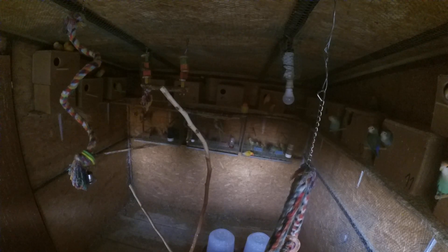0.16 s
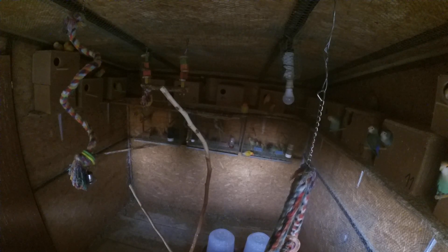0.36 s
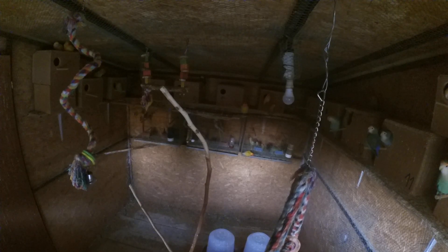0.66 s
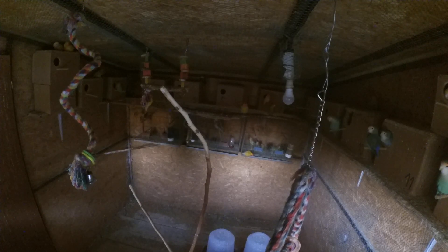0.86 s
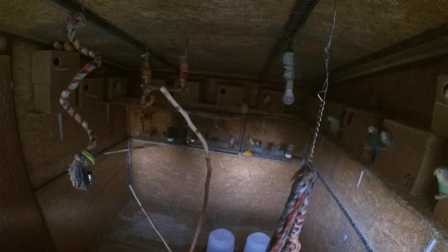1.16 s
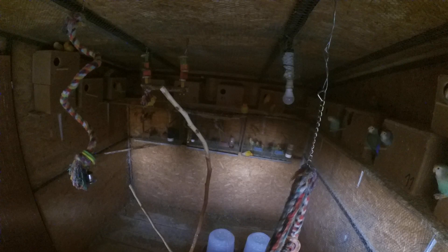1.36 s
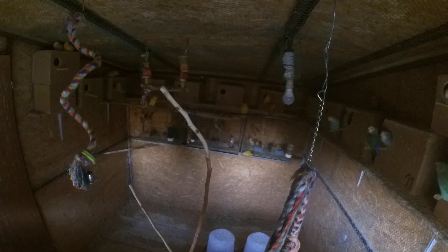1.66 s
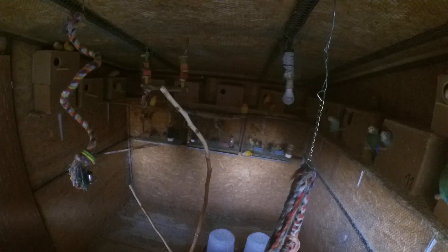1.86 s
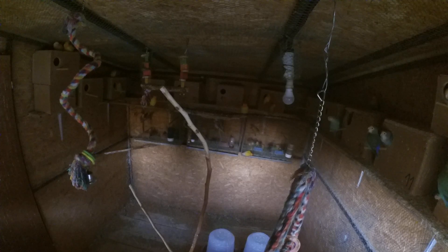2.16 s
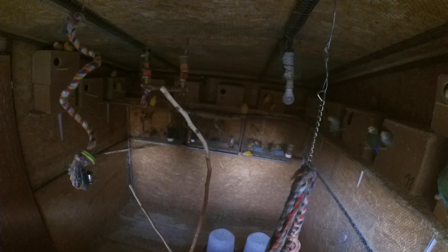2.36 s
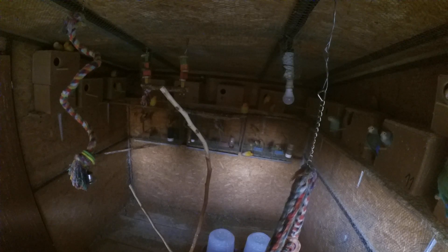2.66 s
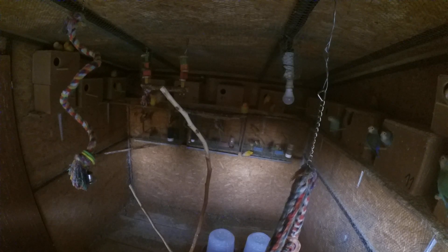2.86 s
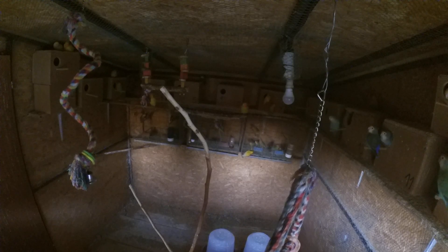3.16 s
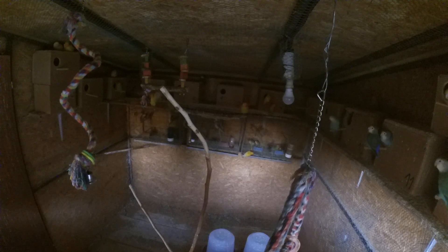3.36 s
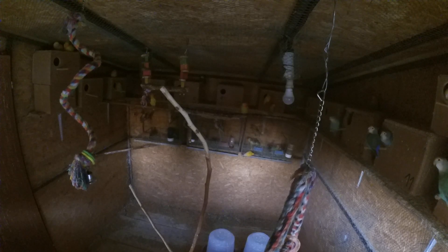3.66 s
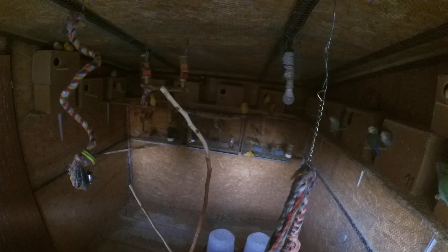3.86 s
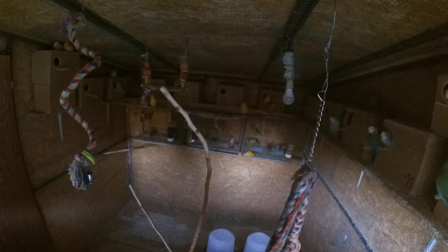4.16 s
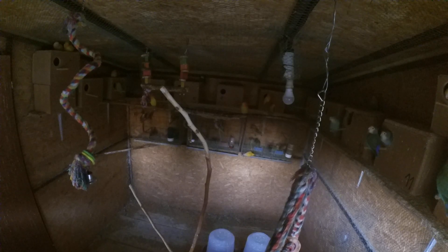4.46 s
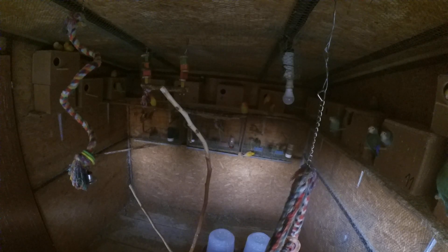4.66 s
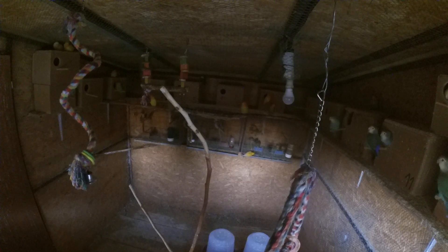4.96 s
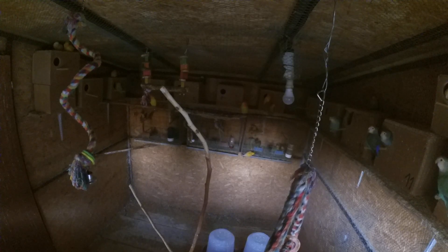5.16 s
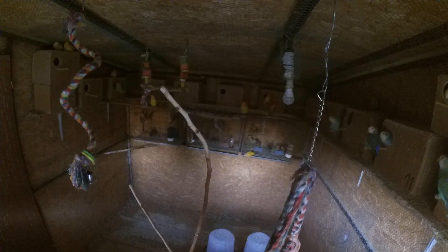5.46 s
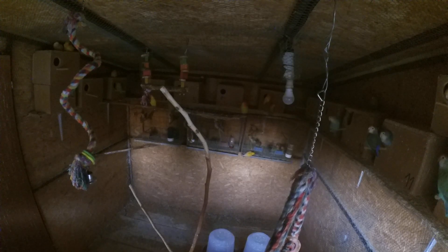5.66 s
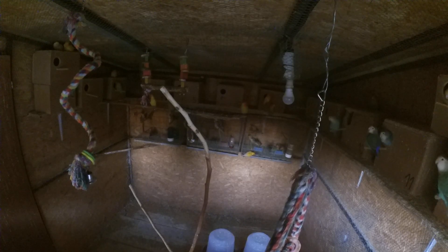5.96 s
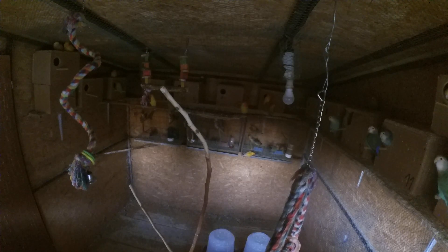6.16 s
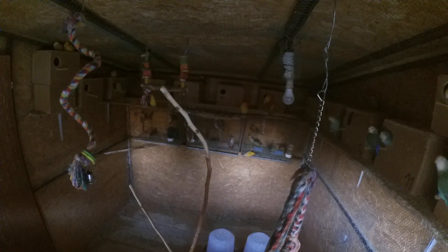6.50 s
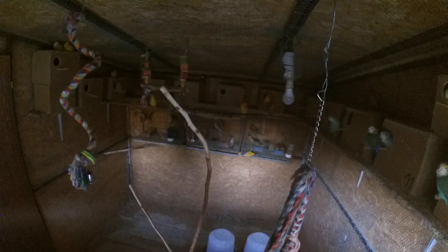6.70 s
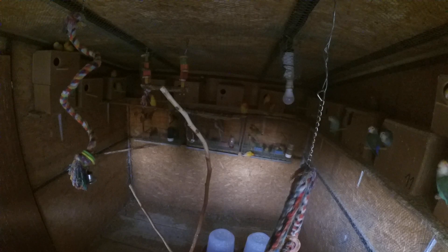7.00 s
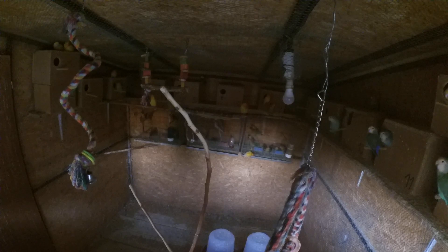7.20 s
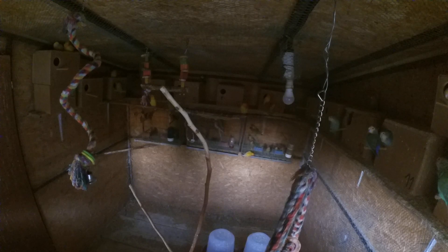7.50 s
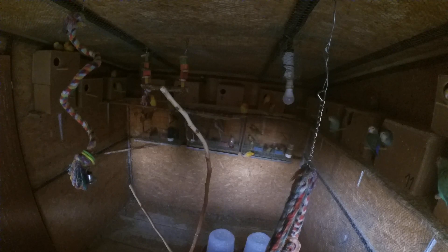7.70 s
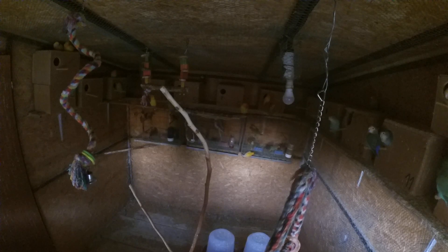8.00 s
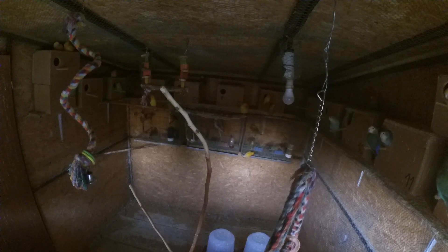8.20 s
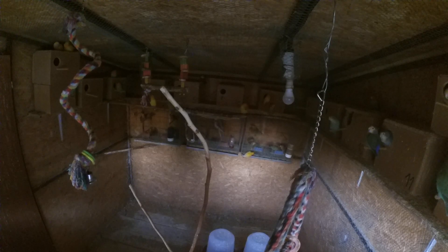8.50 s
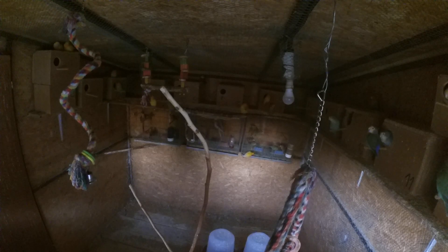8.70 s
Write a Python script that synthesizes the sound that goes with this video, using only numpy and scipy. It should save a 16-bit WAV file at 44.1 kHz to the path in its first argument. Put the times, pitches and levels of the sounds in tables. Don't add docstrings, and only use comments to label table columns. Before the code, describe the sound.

Small parrots chirp in sharp, rough bursts inside a wooden aviary, with quiet gaps holding only faint rumble, hiss and a low fan hum.

```python
import sys
import numpy as np
from scipy import signal
from scipy.io import wavfile
from scipy.ndimage import uniform_filter1d

SR = 44100
rng = np.random.default_rng(int(sys.argv[2]) if len(sys.argv) > 2 else 0)


def elevation(decibels):
    levels = np.asarray(decibels, float)
    return 10 ** (levels / 20)


def unload_wav(signal):
    wavfile.write(
        sys.argv[1],
        SR,
        np.round(np.clip(np.atleast_2d(signal).T, -1, 1) * 32767).astype(np.int16),
    )


N = 389844

# start_s, climb_s, start_hz, high_hz, level_db
LEAPS = [
    (.503, 0.026, 5025, 6516, -27.5),
    (1.062, 0.0085, 5250, 6525, -24),
    (1.511, 0.019, 4420, 6830, -32),
    (2.902, 0.05, 4256, 6290, -24),
    (3.212, 0.052, 4280, 6253, -23.5),
    (3.614, 0.031, 4427, 6360, -23),
]
CLIMB_SHARE, CLIMB_RISE_DB = .65, 3
SNAP_S, SNAP_HZ, SNAP_DB, SNAP_FADE_DB = 0.0055, 5250, 2, 9.5
HIGH_S, HIGH_DB, HIGH_FADE_DB = .016, -1, 3.5

# start_s, length_s, pitch_hz, final_db
SWELLS = [(1.129, 0.036, 2948, -34.5), (1.483, 0.034, 3840, -39), (1.618, 0.078, 3370, -42.5),
          (1.714, 0.0043, 3940, -33), (.12, 0.016, 4260, -26), (1.754, 0.012, 4090, -42),
          (1.915, 0.03, 4190, -42), (1.915, 0.018, 5400, -55), (1.926, 0.05, 3394, -41.5),
          (2.249, 0.0091, 3560, -39), (2.476, 0.015, 3850, -36), (2.486, 0.018, 4123, -31.5),
          (3.247, 0.019, 4270, -31), (3.312, 0.05, 5073, -14), (5.57, 0.0077, 3480, -24.5),
          (5.658, 0.011, 3964, -28.5), (5.831, 0.0072, 5250, -33.5), (5.85, 0.022, 4330, -40),
          (5.998, 0.023, 3913, -38), (6.617, 0.023, 4305, -32), (6.635, 0.028, 4060, -29),
          (7.636, 0.022, 3480, -47), (8.616, 0.013, 4123, -21.5), (8.68, 0.011, 4120, -25),
          (8.712, 0.048, 3350, -25.5)]
SWELL_DB, SWELL_HZ_PER_S = 14, 1620

# start_s, length_s, pitch_hz, level_db
HOLDS = [(.04, 0.0052, 5150, -23), (.053, 0.025, 6400, -28.5), (.138, .012, 4200, -18),
         (.156, 0.023, 4250, -30), (.154, .014, 4900, -30), (.178, 0.021, 6300, -29.5),
         (.362, 0.029, 5200, -28.5), (.627, .008, 5200, -34), (.872, 0.026, 4150, -22),
         (1.942, 0.027, 4150, -42), (1.93, 0.033, 6800, -56.5), (5.299, 0.015, 5300, -43),
         (5.418, .016, 3830, -25.5), (5.584, 0.0079, 4110, -20), (5.84, 0.027, 3900, -30),
         (5.878, 0.041, 3640, -24.5), (.668, 0.021, 5950, -35.5), (.67, 0.016, 6500, -39.5),
         (.952, 0.017, 6120, -30.5), (.906, 0.035, 3883, -26), (1.121, 0.062, 4200, -41),
         (1.601, 0.053, 1700, -56), (1.674, 0.043, 4030, -38), (1.69, 0.019, 3500, -44),
         (1.712, 0.036, 3290, -41.5), (1.785, 0.042, 2067, -55.5), (2.269, 0.016, 4060, -33),
         (2.297, 0.017, 4180, -33), (2.319, 0.055, 3930, -31), (4.022, 0.046, 3260, -50.5),
         (5.674, 0.029, 3220, -27), (5.922, 0.056, 3930, -20), (6.599, 0.033, 4150, -47),
         (6.62, .02, 3720, -39), (6.652, 0.026, 4450, -32.5), (6.667, 0.011, 5080, -36),
         (6.674, .013, 4170, -26.5), (6.683, 0.016, 3800, -40), (6.7, 0.013, 4280, -33),
         (7.608, 0.037, 3320, -58), (7.657, 0.03, 4100, -42), (7.662, 0.031, 3500, -42),
         (8.211, 0.052, 3450, -62), (8.708, 0.055, 6750, -42), (8.793, 0.067, 3450, -48)]
HOLD_FADE_DB, HOLD_HZ_PER_S = 0, 300

# start_s, length_s, pitch_hz, first_db
BARKS = [(.973, .003, 5404, -15), (.983, .003, 5600, -17.5), (1.158, 0.0065, 4080, -29),
         (5.385, .003, 4140, -25), (5.452, .016, 3850, -29), (3.549, .006, 4050, -23),
         (5.603, .012, 4130, -15), (.208, 0.0094, 6410, -44), (.637, 0.0036, 4340, -20),
         (.946, 0.0097, 4140, -19.5), (.966, .037, 6060, -39), (1.086, 0.015, 4097, -18.5),
         (1.092, 0.019, 5050, -28), (1.191, 0.022, 6793, -40), (1.513, 0.018, 4480, -23),
         (1.544, 0.041, 5430, -35), (1.776, 0.037, 4122, -28), (2.526, 0.079, 3950, -39),
         (2.55, .04, 7620, -55), (3.388, 0.0071, 7060, -22), (3.656, .031, 5240, -30),
         (5.309, 0.1, 4040, -33), (5.385, 0.022, 5280, -37), (5.677, 0.022, 4235, -26),
         (6.697, 0.013, 4070, -24), (6.948, 0.018, 3926, -41.5), (7.61, .06, 6470, -62),
         (7.713, 0.049, 3450, -56), (8.584, 0.015, 4100, -18.5), (8.606, 0.021, 5000, -26),
         (8.59, 0.03, 6070, -33.5), (8.618, 0.034, 5780, -29), (8.648, 0.054, 3137, -28),
         (8.792, 0.089, 3820, -37)]
BARK_FADE_DB, BARK_HZ_PER_S = 12.5, 310

# start_s, length_s, start_hz, end_hz, final_db
SLIDES = [(1.171, .028, 3280, 3500, -24), (.37, 0.028, 5790, 6700, -30), (.399, .016, 6700, 6100, -32.5),
          (.638, 0.024, 4400, 5700, -26), (.655, .022, 5980, 6800, -34), (.836, 0.029, 3946, 4150, -33),
          (0.79, 0.052, 3300, 3800, -54.5), (.945, .042, 5074, 5500, -28), (1.484, 0.023, 5380, 6090, -41),
          (1.528, 0.021, 4960, 5330, -34.5), (1.599, 0.021, 3240, 3660, -44),
          (2.277, 0.021, 4600, 5660, -44.5), (2.507, 0.017, 4800, 5720, -44),
          (2.692, 0.025, 2790, 3100, -57), (2.693, 0.025, 4300, 4620, -57),
          (3.216, 0.035, 6390, 7160, -43.5), (3.365, 0.02, 6440, 6940, -26),
          (3.492, 0.04, 3490, 3934, -38.5), (3.538, 0.028, 3947, 4200, -26.5),
          (3.555, 0.083, 3873, 4250, -29), (3.594, 0.043, 6030, 6840, -36.5),
          (5.328, 0.05, 4647, 4300, -30), (5.371, 0.0697, 3945, 3765, -32), (5.382, 0.021, 4240, 4350, -44),
          (5.706, 0.063, 3783, 4155, -34.5), (6.952, 0.026, 4595, 3950, -49.5),
          (8.571, 0.017, 3510, 3980, -39.5), (8.676, 0.031, 2016, 2184, -42.5),
          (8.754, 0.014, 3440, 3680, -22.5), (8.772, 0.016, 3710, 3854, -19.5)]
# start_s, length_s, start_hz, end_hz, final_db
ASIDES = [(4.02, .045, 6100, 6600, -66), (4.022, .045, 9300, 9800, -67), (4.02, .035, 7700, 7750, -69),
          (4.02, .03, 4400, 4600, -66), (6.985, .04, 11000, 11050, -71), (7.61, .04, 9600, 10000, -70),
          (7.43, .04, 8800, 8900, -74), (2.468, .012, 3300, 4000, -44), (0, 0.0065, 4710, 4850, -38),
          (0.023, 0.023, 3780, 4010, -36.5), (.16, 0.015, 6700, 6900, -40), (0.36, 0.0086, 3930, 4080, -47),
          (2.466, 0.03, 3260, 3490, -50), (3.296, .012, 6190, 6310, -30.5),
          (5.621, 0.032, 2886, 3066, -34.5), (7.43, 0.012, 3100, 3040, -62.5),
          (1.129, 0.043, 5800, 6100, -39.5), (6.606, .035, 3060, 3480, -44.5),
          (6.69, 0.028, 3300, 3100, -47), (1.481, 0.037, 4100, 4220, -40.5),
          (1.595, 0.062, 4270, 4130, -46.5), (1.109, 0.017, 3940, 3200, -29.5),
          (6.925, 0.014, 3300, 3570, -51), (6.93, 0.021, 6840, 7150, -77), (6.99, 0.037, 3560, 3850, -50.5),
          (7.427, 0.01, 5880, 6120, -68.5), (7.678, 0.017, 7000, 7070, -58),
          (8.195, 0.036, 2900, 3300, -62), (8.196, 0.022, 5640, 6100, -69),
          (8.217, 0.031, 6830, 6830, -70.5), (8.25, .025, 6220, 6100, -70), (8.271, 0.014, 4300, 4300, -69)]
SLIDE_SWELL_DB = 4.5

# start_s, length_s, start_hz, end_hz, final_db
RUN_UPS = [(.11, 0.01, 3440, 4130, -34.5), (.348, 0.0072, 3900, 5230, -32), (.494, 0.0086, 3800, 5080, -39),
           (.02, 0.0096, 4200, 4900, -34), (.029, .007, 4900, 5300, -21), (.936, .007, 3800, 4990, -30),
           (1.055, .005, 3900, 5200, -28.5), (1.508, 0.0039, 3900, 6370, -32),
           (6.66, 0.024, 4600, 6200, -39.5), (.617, 0.018, 4100, 4450, -46),
           (2.895, 0.0075, 3994, 4140, -36.5), (3.205, 0.022, 3390, 3740, -37.5),
           (5.281, 0.015, 3900, 4530, -38), (5.311, 0.02, 3950, 4520, -33)]
RUN_UP_SWELL_DB = 5

# start_s, harshness (0-1), half_pitch_db (half-pitch line and its odd multiples)
VOICE = [(0, .5, -24), (.13, .15, -28), (.15, .9, -24), (.8, .4, -40), (.94, .85, -28), (1.16, .2, -36),
         (1.4, .8, -32), (2.31, .2, -38), (2.45, .8, -36), (2.85, .65, -24), (3.31, .06, -27),
         (3.36, .5, -26), (3.48, .65, -36), (3.6, .7, -25), (4, .3, -34), (5.2, .85, -32), (5.4, .2, -34),
         (5.5, .4, -32), (5.61, .2, -38), (5.68, .6, -38), (5.87, .45, -40), (6.5, .9, -34),
         (8.64, .3, -34)]
# multiple (of its pitch), level_db
PARTIALS = [
    (.5, 2),
    (1, 1.5),
    (1.5, 3.5),
    (2, -23),
    (2.5, -9.5),
]
FLUTTER_HZ, RASP_HZ, WAVER_HZ = 205, 910, 148
ATTACK_S, RELEASE_S, LOUDEST_DB = .004, .007, -18.5
BEAK_CUT_HZ = 10000
BREATH_DB, BREATH_HZ, BREATH_TOP_HZ = -9, 3300, 7060

AVIARY_T60_S, TREBLE_T60_S, AVIARY_DB = 0.2, 0.17, -5
LATE_T60_S, LATE_DB = .45, -31.5

# multiple (of the turn rate), level_db
HUM = [
    (1, -66),
    (2, -73.5),
    (3, -80.5),
]
# centre_hz, width_hz, level_db
RATTLE = [
    (1528, 150, -6),
    (2330, 220, -1),
    (2620, 280, 4.5),
    (3050, 420, -2),
    (4300, 790, -7.5),
]
TURNS_PER_S, RATTLE_DB = 68, -66
TICK_DB = -78.5

# start_s, length_s, treble_lift_db
RUSTLES = [(2.61, .19, 4), (3.74, .09, 5), (3.865, .085, 6), (4.02, .08, 7), (4.23, .1, 5), (4.55, .1, 4),
           (4.685, .025, 6), (4.89, .13, 5), (5.155, .105, 5), (6.325, .105, 6), (7.05, .09, 5),
           (7.355, .075, 5), (7.46, .05, 5), (7.78, .09, 4), (7.905, .04, 5), (8.0, .06, 4), (8.31, .04, 4)]
RUSTLE_TOP_HZ, RUSTLE_RATTLE = 10500, .06

# frequency_hz, density_db (per Hz)
AIR = [(7.1, -32), (12, 6), (70, -4), (92, -13.5), (136, -13.5), (163, -31.5), (201, -21), (240, -23),
       (847, -33.5), (2490, -32.5), (4020, -36.5), (15500, -53)]
AIR_DB = -52
# time_s, wind_db, traffic_db
AROUND = [
    (0, 2.5, 21),
    (.8, 6.5, 9.5),
    (1.3, 3, -3),
    (3, 4.5, 3),
    (4.1, -1, 0),
    (4.3, 1, 5.5),
    (5.2, 0, 7.5),
    (6.1, -3.5, -3.5),
    (7.9, 2, 0),
    (8.84, 0.5, -1),
]

# start_s, length_s, level_db
CHATTER = [
    (4.33, .65, -76),
    (6.47, .13, -73),
    (7.32, .1, -75),
    (8.28, .15, -78),
]
CHATTER_HZ, CHATTER_WIDTH_HZ = 4200, 400

CHIP_RATE, FILE_RATE = 49152, 48000
PRESENCE_HZ, PRESENCE_WIDTH_HZ, PRESENCE_DB = 12730, 2800, -3
CUTOFF_HZ = 15800


def drift(rate, size=N):
    r = np.exp(-2 * np.pi * rate / SR)
    slow = signal.lfilter([1], [1, -2 * r, r * r], rng.standard_normal(size + SR))[SR:]
    return slow / np.std(slow)


def in_time(rows):
    s, *columns = np.transpose(rows)
    return [np.interp(np.arange(N) / SR, s, c) for c in columns]


def spans(rows):
    t = np.arange(N) / SR
    gate = sum(value * ((t >= s) & (t < s + length)) for s, length, value in rows)
    return uniform_filter1d(gate, size=200)


def resonance(x, hz, width):
    r = np.exp(-np.pi * width / SR)
    poles = [1, -2 * r * np.cos(2 * np.pi * hz / SR), r * r]
    return signal.lfilter([(1 - r * r) / 2, 0, (r * r - 1) / 2], poles, x)


def band(x, low_hz, high_hz):
    return signal.sosfilt(signal.butter(2, [low_hz, high_hz], "band", fs=SR, output="sos"), x)


def notes():
    out = []
    for s, climb, hz, high_hz, db in LEAPS:
        climb_end_hz = hz + CLIMB_SHARE * (SNAP_HZ - hz)
        snap_db, high_db = db + SNAP_DB, db + HIGH_DB
        out += [(s, climb, hz, climb_end_hz, db - CLIMB_RISE_DB, db),
                (s + climb - SNAP_S / 2, SNAP_S, SNAP_HZ, SNAP_HZ, snap_db, snap_db - SNAP_FADE_DB),
                (s + climb, HIGH_S, high_hz, high_hz, high_db, high_db - HIGH_FADE_DB)]
    for table, hz_per_s, rise_db, fall_db in [(SWELLS, SWELL_HZ_PER_S, SWELL_DB, 0),
                                              (HOLDS, HOLD_HZ_PER_S, 0, HOLD_FADE_DB),
                                              (BARKS, BARK_HZ_PER_S, 0, BARK_FADE_DB)]:
        for s, length, hz, db in table:
            half_glide = hz_per_s * length / 2
            out.append((s, length, hz - half_glide, hz + half_glide, db - rise_db, db - fall_db))
    for table, rise_db in [(RUN_UPS, RUN_UP_SWELL_DB), (SLIDES, SLIDE_SWELL_DB), (ASIDES, SLIDE_SWELL_DB)]:
        out += [(s, length, hz, end_hz, db - rise_db, db) for s, length, hz, end_hz, db in table]
    return out


def birds():
    voice, effort = np.zeros(N), np.zeros(N)
    flutter, rasp, waver = drift(FLUTTER_HZ), drift(RASP_HZ), drift(WAVER_HZ)
    for k, (s, length, start_hz, end_hz, start_db, end_db) in enumerate(notes()):
        first = max(0, round((s - .0015) * SR))
        at = np.arange(first, min(N, round((s + length + 0.0079) * SR)))
        along = np.linspace(0, 1, len(at))
        _, harsh, half_db = [row for row in VOICE if row[0] <= s][-1]
        own = (at + 977 * k) % N

        ramp = np.minimum(along / ATTACK_S, (1 - along) / RELEASE_S) * len(at) / SR
        edges = np.sin(np.pi / 2 * np.minimum(1, ramp)) ** 2
        level_db = start_db + (end_db - start_db) * np.minimum(1, 1.55 * along)
        level = elevation(np.minimum(LOUDEST_DB, level_db)) * edges

        pitch_hz = start_hz + (end_hz - start_hz) * along + 120 * harsh * waver[own]
        phase = 2 * np.pi * np.cumsum(pitch_hz) / SR
        tone = 0
        for m, partial_db in PARTIALS:
            beak = 1 / (1 + (m > 1) * (m * start_hz / BEAK_CUT_HZ) ** 6)
            tone = tone + elevation(partial_db + half_db * (m % 1 > 0)) * beak * np.sin(m * phase)
        roughness = 1 + harsh * (.55 * flutter[own] + .3 * rasp[own])
        voice[at] += np.sqrt(2) * level * roughness * tone
        effort[at] += level * harsh ** 2
    breath = effort * rng.standard_normal(N)
    for _ in range(2):
        breath = band(breath, BREATH_HZ, BREATH_TOP_HZ)
    return elevation(-2.5) * voice + elevation(BREATH_DB) * breath


def aviary(x):
    t = np.arange(SR // 2) / SR
    low, high = rng.standard_normal((2, len(t))) * np.clip((t - .002) / 0.0013, 0, 1)
    tail = band(low, 100, 5450) * elevation(-60 * t / AVIARY_T60_S)
    tail = tail + band(high, 5260, 11000) * elevation(-60 * t / TREBLE_T60_S)
    tail = tail + band(high, 2500, 7000) * elevation(LATE_DB - 60 * t / LATE_T60_S)
    tail = tail / np.sqrt(np.sum(tail ** 2))
    return x + elevation(AVIARY_DB) * signal.fftconvolve(x, tail)[:N]


def fan():
    turns = np.cumsum(TURNS_PER_S + 4 * drift(5) + 4 * drift(20)) / SR
    hum = 0
    for m, level_db in HUM:
        hum = hum + np.sqrt(2) * elevation(level_db + 2.5 * drift(7.8)) * np.sin(2 * np.pi * m * turns)

    strength = elevation(2.5 * np.clip(rng.standard_normal(N // 100), -3, 1.2))[turns.astype(int)]
    contact = np.exp(-((turns % 1 - .5) / .12) ** 2)
    scrape = strength * contact * rng.standard_normal(N)
    scrape = scrape + RUSTLE_RATTLE * spans(RUSTLES) * rng.standard_normal(N)

    rattle = 0
    for hz, width, level_db in RATTLE:
        rattle = rattle + elevation(level_db) * resonance(resonance(scrape, hz, width), hz, 2 * width)
    rattle = band(rattle, 1300, 3400)
    tick = elevation(2.0 * drift(7.5)) * band(scrape, 6900, 10000)
    return hum + elevation(RATTLE_DB) * rattle / np.std(rattle) + elevation(TICK_DB) * tick / np.std(tick)


def air():
    wind_db, traffic_db = in_time(AROUND)
    rustle_db, gusts_db = spans(RUSTLES), 2.5 * drift(6)
    edges = 11 * 2 ** np.arange(0, 10.6, .5)
    white = rng.standard_normal((2, N + SR))
    points_hz, points_db = np.transpose(AIR)
    out = 0
    for k, (low, high) in enumerate(zip(edges, edges[1:])):
        hz = np.sqrt(low * high)
        wind_share = np.clip(np.log2(200 / hz) / 1.5, 0, 1)
        traffic_share = np.exp(-(np.log2(hz / 680) / .9) ** 2)
        rustle_share = np.clip(np.log2(hz / 1200) / 0.88, 0, 1) / (1 + (hz / RUSTLE_TOP_HZ) ** 8)
        level_db = np.interp(np.log(hz), np.log(points_hz), points_db)
        level_db = level_db + wind_share * (wind_db + gusts_db)
        level_db = level_db + traffic_share * traffic_db + rustle_share * rustle_db
        out = out + elevation(level_db) * band(white[k % 2], low, high)[SR:]
    return elevation(AIR_DB) * out / np.std(out)


def chatter():
    noise = resonance(rng.standard_normal(N), CHATTER_HZ, CHATTER_WIDTH_HZ)
    blur = noise * elevation(3.0 * drift(25))
    return spans([(s, length, elevation(db)) for s, length, db in CHATTER]) * blur / np.std(blur)


def scene():
    mono = aviary(birds()) + fan() + air() + chatter()
    return np.array([mono, mono])


def skip_samples(x):
    chip = signal.resample_poly(x, CHIP_RATE, SR)
    ticks = np.arange(len(chip) * FILE_RATE // CHIP_RATE)
    kept = chip[ticks * CHIP_RATE // FILE_RATE]
    back = signal.resample_poly(kept, SR, FILE_RATE)
    return np.pad(back, (0, N))[:N]


def roll_off(x):
    return signal.sosfilt(signal.butter(12, 15710, fs=SR, output="sos"), x)


def record(dry):
    mono = skip_samples(dry[0])
    mono = mono + elevation(PRESENCE_DB) * resonance(mono, PRESENCE_HZ, PRESENCE_WIDTH_HZ)
    mono = signal.sosfilt(signal.cheby2(16, 70, CUTOFF_HZ, fs=SR, output="sos"), mono)
    apart = elevation(-82) * drift(90)
    return roll_off(np.array([mono + apart, mono - apart]))


dry = scene()
out = record(dry)
unload_wav(out)
```